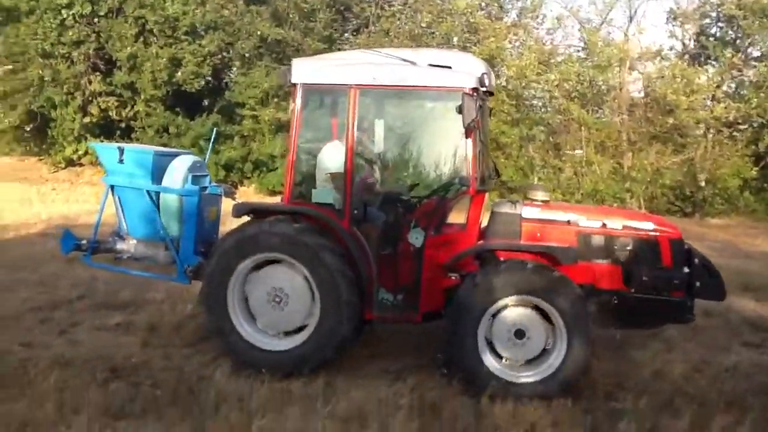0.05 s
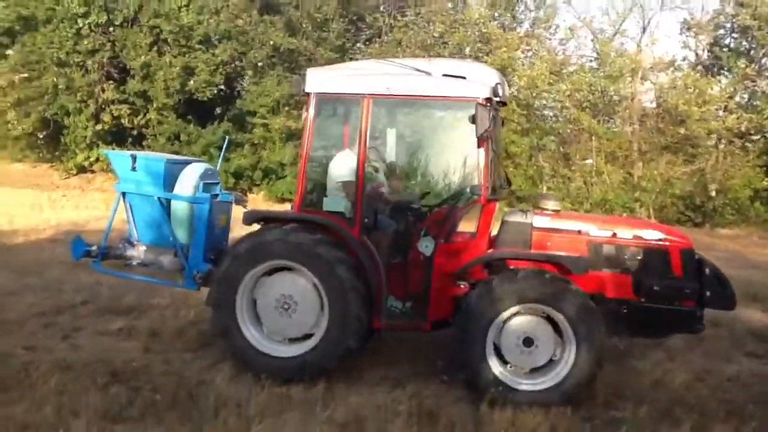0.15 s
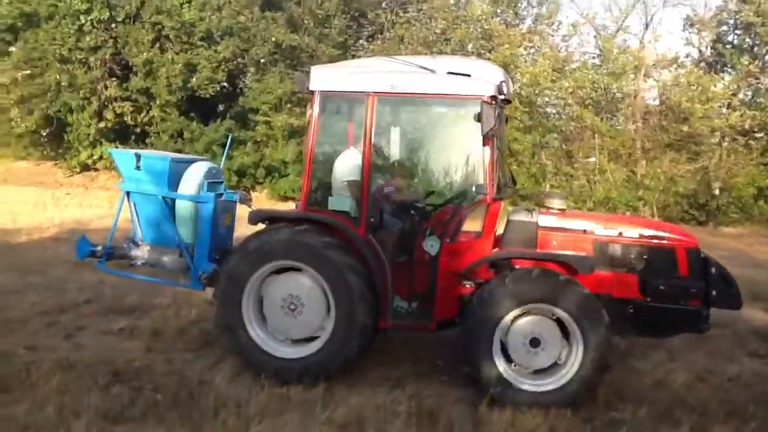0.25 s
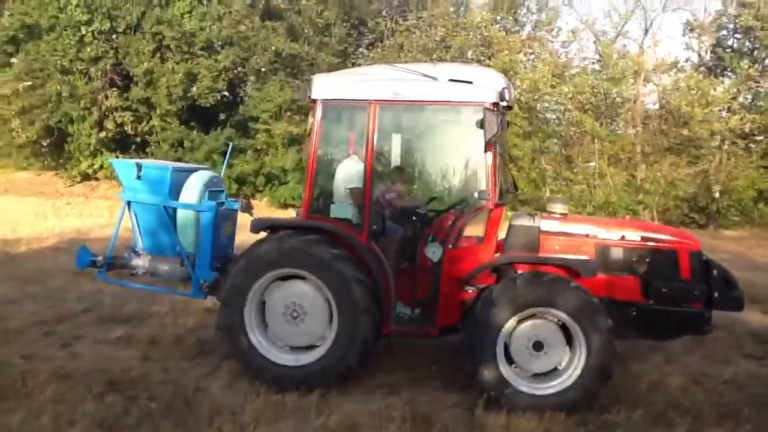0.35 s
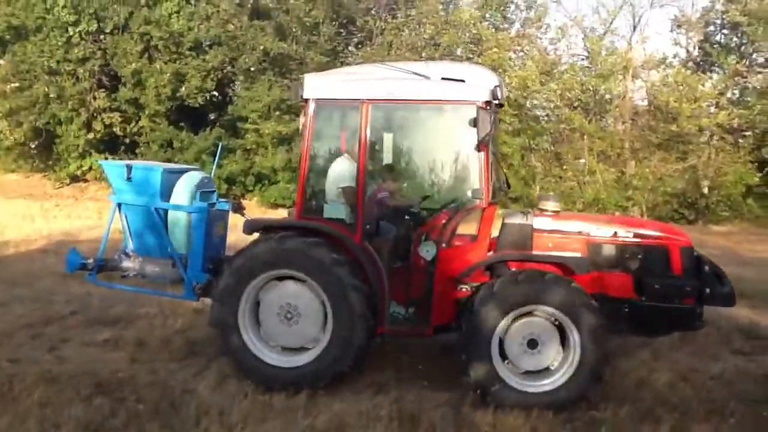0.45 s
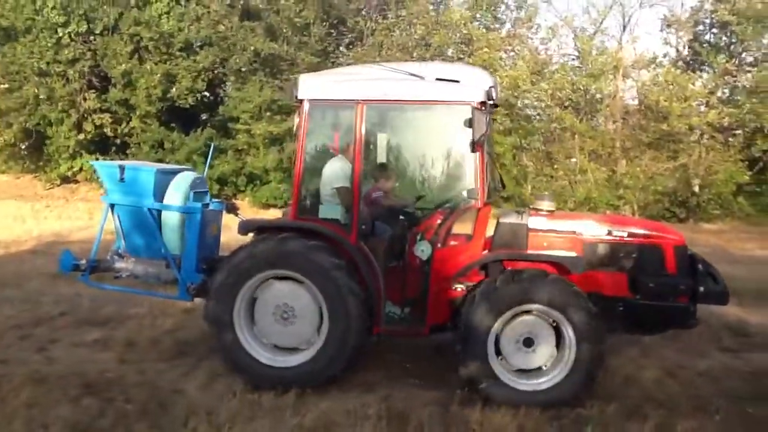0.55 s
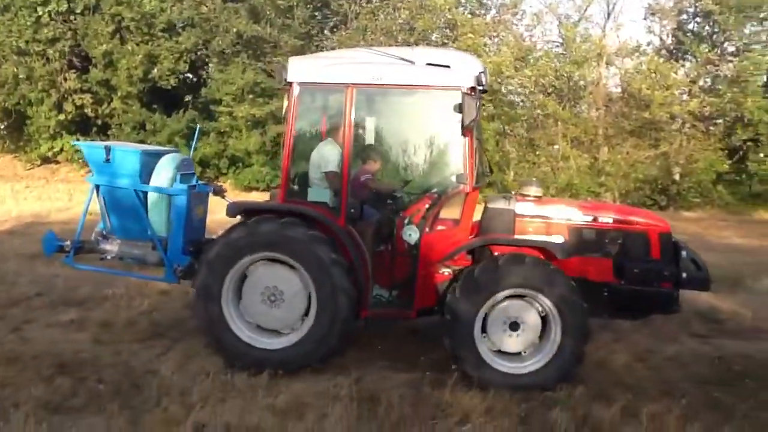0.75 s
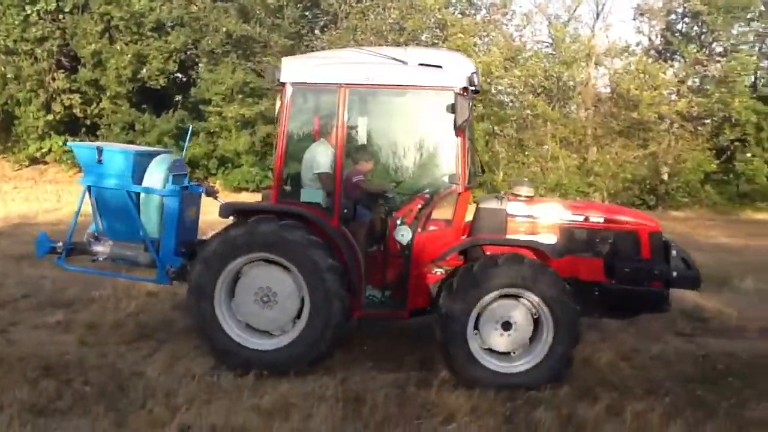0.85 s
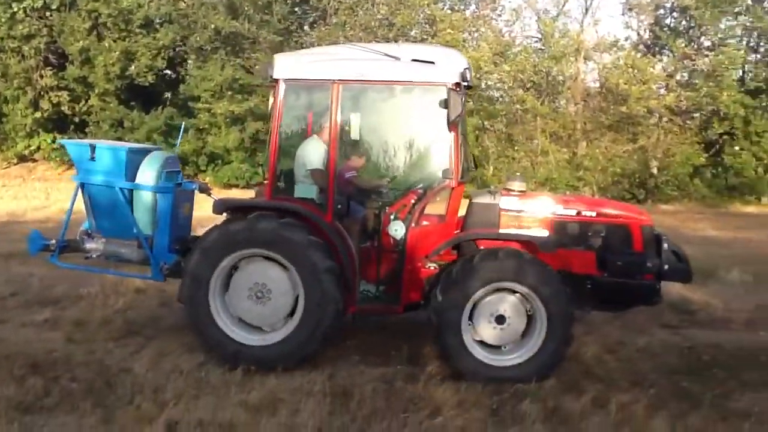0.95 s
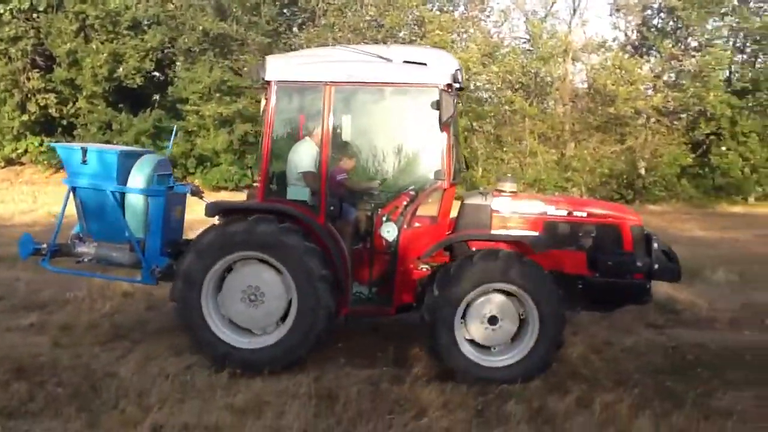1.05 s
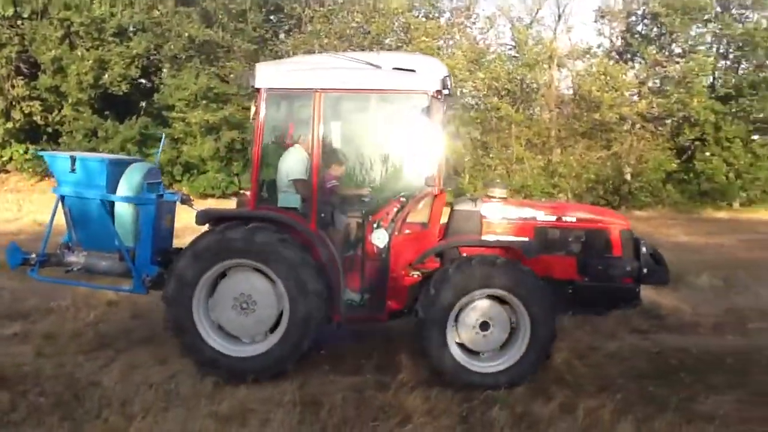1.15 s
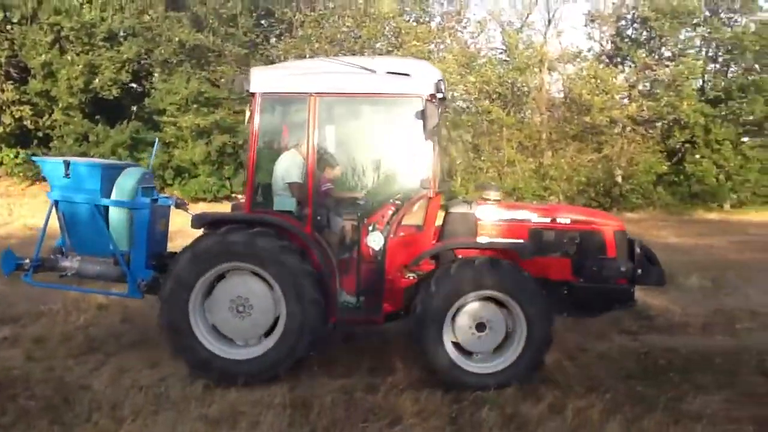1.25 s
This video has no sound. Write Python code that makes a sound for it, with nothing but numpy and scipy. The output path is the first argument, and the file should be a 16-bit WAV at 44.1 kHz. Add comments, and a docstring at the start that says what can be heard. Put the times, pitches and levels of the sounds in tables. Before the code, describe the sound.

A tractor horn toots once, briefly, over a low idling diesel engine.

```python
"""A field edged by trees, one microphone. A small four-cylinder diesel tractor rolls by at idle and toots.
Its electric horn buzzes as the diaphragm strikes its pole, and the tone disc clangs along.
The wood's edge returns a short tail, the distant trees a faint echo. Underneath, the exhaust booms
unevenly and the engine drones, throbs and clatters with each firing. A brief dry rustle follows the toot."""
import sys
import numpy as np
from scipy import signal
from scipy.fft import rfft, irfft
from scipy.io import wavfile
from scipy.ndimage import uniform_filter1d

SR = 44100
rng = np.random.default_rng(int(sys.argv[2]) if len(sys.argv) > 2 else 0)


def generate_wav(signal):
    """Clip the signal to [-1, 1] and save it as 16-bit WAV at the path in sys.argv[1]."""
    frames = np.transpose(np.atleast_2d(signal))
    scaled = np.clip(frames, -1, 1) * 32767
    pcm = np.round(scaled).astype(np.int16)
    wavfile.write(sys.argv[1], SR, pcm)


N = 57330

HORN_ON_S, HORN_OFF_S, HORN_HZ = .227, .5129, 487.75
FIRING_HZ, FIRST_FIRING_S = 31.55, .005

# Horn harmonics at the microphone, fundamental first; the balance shifts as the tractor moves.
# Columns: mid_toot_level_db, change_over_toot_db
HORN_HARMONICS = [(-31.5, -7), (-18, -1), (-19, 6), (-25.5, 11.5), (-17.5, -9.5), (-16.5, -6.5), (-24, 7.5),
                  (-20, -5.5), (-26.5, 1), (-32, -10), (-40.5, 4), (-30.5, -4), (-40, 4), (-33.5, -3.5),
                  (-49.5, 12)]


def horn(t):
    """The diaphragm strikes its pole once a cycle; it starts flat and goes sharp when the current stops."""
    since_on, since_off = np.maximum(t - HORN_ON_S, 0), np.maximum(t - HORN_OFF_S, 0)
    bend = .044 * (1 - np.exp(-since_off / .012)) - .023 * np.exp(-since_on / .0096)
    cycles = np.cumsum(HORN_HZ * (1 + bend + .0002 * walk(150))) / SR
    progress = np.clip(since_on / (HORN_OFF_S - HORN_ON_S), 0, 1) - .5
    listed = len(HORN_HARMONICS)
    buzz = 0
    for k in range(1, 32):
        hz = k * HORN_HZ
        rolloff_db = -48 - 3.1 * (hz - listed * HORN_HZ) / 1000
        level_db, change_db = HORN_HARMONICS[k - 1] if k <= listed else (rolloff_db, 0)
        swell_db = 6 * np.exp(-((t - .35) / .058) ** 2 - ((hz - 4300) / 290) ** 2)  # upper mids, mid-toot
        shimmer_db = .35 * hz / 1000 * walk(5)
        gain = undb(level_db + change_db * progress + swell_db + shimmer_db)
        phase = rng.normal(0, .4) - .45 * k ** 2  # spreads each strike over the cycle
        buzz += gain * toot_envelope(t, hz) * np.sin(2 * np.pi * k * cycles + phase)
    rasp = noise([(2200, .5), (5000, -7), (9000, -14.5), (15000, -30)])
    rasp *= pulses(cycles, sharp=1.3, floor=.3)
    return buzz + undb(-41) * rasp * toot_envelope(t, 2200)


def toot_envelope(t, hz):
    """Rise and decay of one horn partial: the treble starts later and dies sooner."""
    khz = hz / 1000
    attack_s, decay_s = .017, .021 / khz ** .81
    rise = np.clip((t - HORN_ON_S - .0013 * khz) / attack_s, 0, 1)
    return rise * np.exp(-np.maximum(t - HORN_OFF_S, 0) / decay_s)


# The horn's tone disc and its beats with the buzz. Columns: pitch_hz, level_db
DISC_PARTIALS = [(1321, -43.5), (2093, -40.5), (2296, -34), (2580, -58), (3068, -39.5), (3555, -32.5),
                 (3698, -40), (4043, -64)]


def tone_disc(t):
    """The disc clangs at its own steady pitches while the horn sounds."""
    return sum(undb(db) * toot_envelope(t, hz) * np.sin(2 * np.pi * (hz * t + rng.random()))
               for hz, db in DISC_PARTIALS)


# Exhaust boom of each cylinder, in firing order. Column: level_db
CYLINDER_BOOMS = [-41, -30.5, -32, -39.5]


def exhaust(t):
    """Each firing swells the silencer's low resonance; two cylinders are stronger, so the idle lopes."""
    boom_hz, lag_s, width_s = 198, .012, .011
    booms = 0
    for firing, (size, late) in enumerate(rng.standard_normal((43, 2)), start=-1):
        from_peak = t - (FIRST_FIRING_S + firing / FIRING_HZ + lag_s + .00089 * late)
        gain = undb(CYLINDER_BOOMS[firing % 4] + 1.2 * size)
        booms += gain * np.exp(-(from_peak / width_s) ** 2) * np.cos(2 * np.pi * boom_hz * from_peak)
    return booms


# The engine's drone. Columns: firing_rate_multiple, level_db
DRONE_LINES = [(2, -66.5), (3, -57), (4, -52), (5, -53), (10, -48), (12, -54), (13, -56.5), (15, -51),
               (20, -48.5), (25, -41), (27, -54.5), (28, -52), (30, -59)]
# Low body rumble, mid throb and bright clatter at the microphone. Columns: frequency_hz, relative_db
RUMBLE_SPECTRUM = [(50, -42), (78, -27), (130, -0.5), (220, -5), (270, -5), (330, -2.5), (420, -2),
                   (540, -5.5), (900, -21), (3000, -67)]
THROB_SPECTRUM = [(250, -42), (500, -12.5), (630, -1), (800, -1), (940, -2.5), (1080, -15), (1400, -30),
                  (4000, -44)]
CLATTER_SPECTRUM = [(680, -16), (1150, -3), (1230, -2.5), (1660, -1.5), (2290, -2.5), (2490, -1.5),
                    (3590, -5.5), (3870, -10), (4090, -3), (4960, -9), (5760, -10.5), (9050, -25),
                    (15000, -33.5)]


def engine(t):
    """The idling diesel drones, rumbles and clatters once a firing, and throbs three times a firing."""
    firings = (t - FIRST_FIRING_S) * FIRING_HZ + .003 * walk(1.56)
    drone = sum(undb(db + 2.7 * walk(2)) * np.sin(2 * np.pi * (multiple * firings + rng.random()))
                for multiple, db in DRONE_LINES)
    rumble = noise(RUMBLE_SPECTRUM) * pulses(firings, sharp=4.3, floor=1)
    throb = noise(THROB_SPECTRUM) * pulses(3 * firings - .48, sharp=1.5, floor=.94)
    throb *= pulses(firings - .07, sharp=1, floor=.84)
    clatter = noise(CLATTER_SPECTRUM) * pulses(firings, sharp=.78, floor=1) * undb(.45 * walk(120))
    return drone + undb(-41) * rumble + undb(-38) * throb + undb(-42.5) * clatter


# Resonances of the engine's metal. Columns: pitch_hz, half_width_hz, level_db
METAL_RINGS = [(2246, 160, -53.5), (3567, 67, -51), (6540, 2000, -57.5)]


def knock(t):
    """The combustion knock rings the engine's metal once a firing."""
    rings = 0
    for hz, width, db in METAL_RINGS:
        band = [(hz / 4, -50), (hz - width, -15), (hz, 0), (hz + width, -15), (hz * 2, -50)]
        rings += undb(db) * noise(band)
    return rings * pulses((t - FIRST_FIRING_S) * FIRING_HZ, sharp=2.2, floor=.43)


def near_trees(toot, t, delay_s=.01, t60_s=.22):
    """The wood's edge scatters the toot back to the microphone as a quickly fading tail."""
    tail = noise([(400, -30), (1500, 7), (3000, 7.5), (6000, 9), (9000, -5), (15000, -8)])
    tail *= undb(-60 * t / t60_s) * (t > delay_s)
    tail /= np.sqrt(np.sum(tail ** 2))
    return undb(-19.5) * signal.fftconvolve(toot, tail)[:N]


def far_echo(t, pitch_hz=1970, delay_s=.22, smear_s=.06):
    """From trees some 40 m off, only the toot's partial near 2 kHz carries back, faint and smeared."""
    envelope = uniform_filter1d(toot_envelope(t - delay_s, pitch_hz), int(smear_s * SR))
    return undb(-41.5 + .85 * walk(12)) * envelope * np.sin(2 * np.pi * pitch_hz * t)


def rustle(t, peak_s=.603, width_s=.018):
    """A short high hiss, perhaps dry grass under a tyre."""
    hiss = noise([(4000, -16), (7500, 6), (10000, -2), (12500, -9), (15000, -15)])
    return undb(-47) * hiss * np.exp(-((t - peak_s) / width_s) ** 2)


def undb(db):
    """Decibels to gain."""
    return 10 ** (np.asarray(db) / 20)


def unit(x):
    """Scale to rms 1."""
    return x / np.sqrt(np.mean(x ** 2))


def walk(rate_hz):
    """Smooth random drift with a spread near 1."""
    f = np.arange(N + 1) * SR / (2 * N)
    return unit(irfft(rfft(rng.standard_normal(2 * N)) / (1 + (f / rate_hz) ** 4)))[:N]


def noise(points):
    """Noise of rms 1 shaped by (frequency_hz, relative_db) points, falling away below the first."""
    hz, db = np.array(points, float).T
    f = np.maximum(np.arange(N // 2 + 1) * SR / N, 1)
    gain = undb(np.interp(np.log(f), np.log(hz), db)) * np.minimum(f / hz[0], 1) ** 2
    return unit(irfft(rfft(rng.standard_normal(N)) * gain, N))


def pulses(cycles, sharp, floor):
    """One swell a cycle over a steady floor, at rms 1."""
    return unit(floor + np.exp(sharp * (np.cos(2 * np.pi * cycles) - 1)))


def scene():
    """The field in mono: the toot and its reflections over the idling tractor."""
    t = np.arange(N) / SR
    toot = horn(t) + tone_disc(t)
    reflections = near_trees(toot, t) + far_echo(t)
    idle = exhaust(t) + engine(t) + knock(t)
    return (toot + reflections + idle + rustle(t))[None]


def record(dry, top_hz=15300):
    """The recorder cuts the highest treble."""
    return signal.sosfilt(signal.ellip(10, .1, 80, top_hz, fs=SR, output="sos"), dry)


dry = scene()
out = record(dry)
generate_wav(out)
```